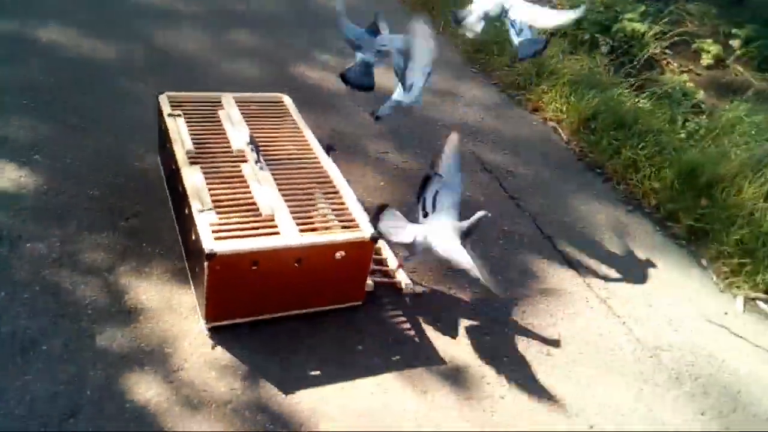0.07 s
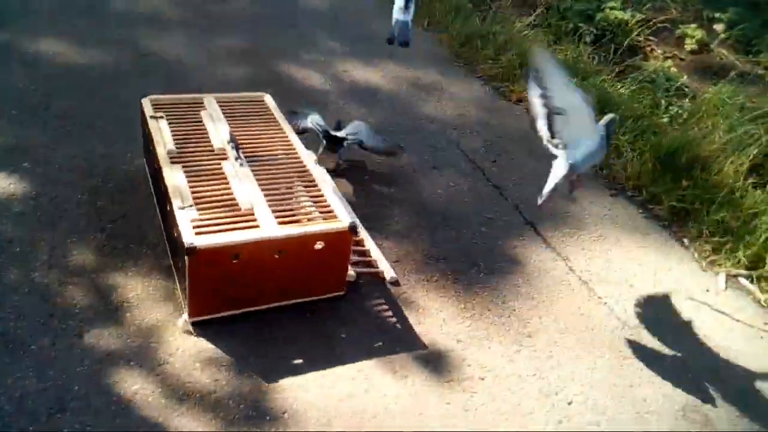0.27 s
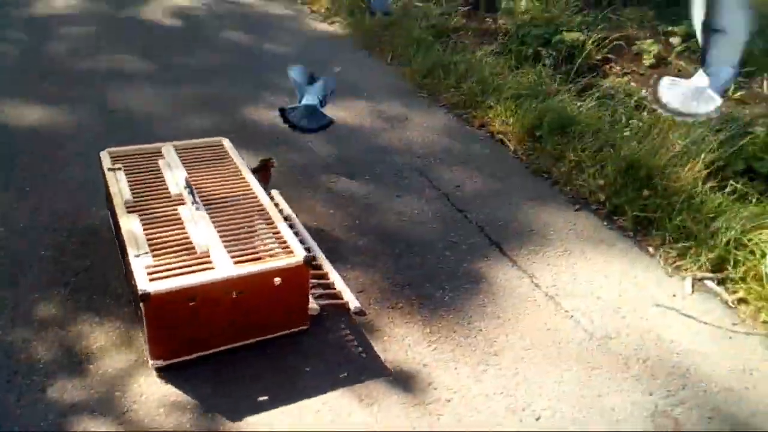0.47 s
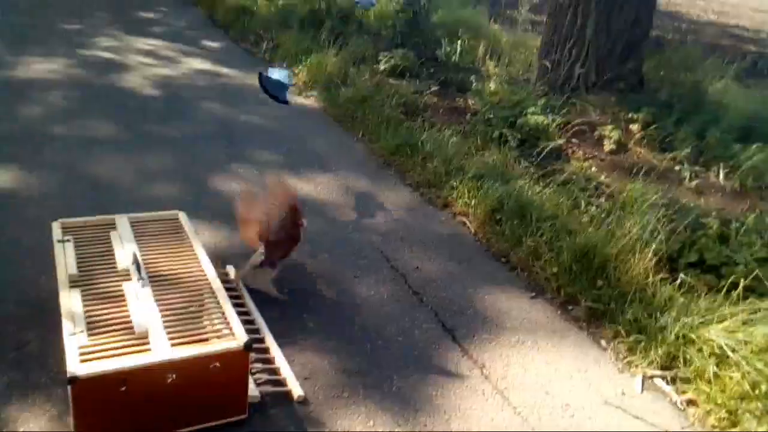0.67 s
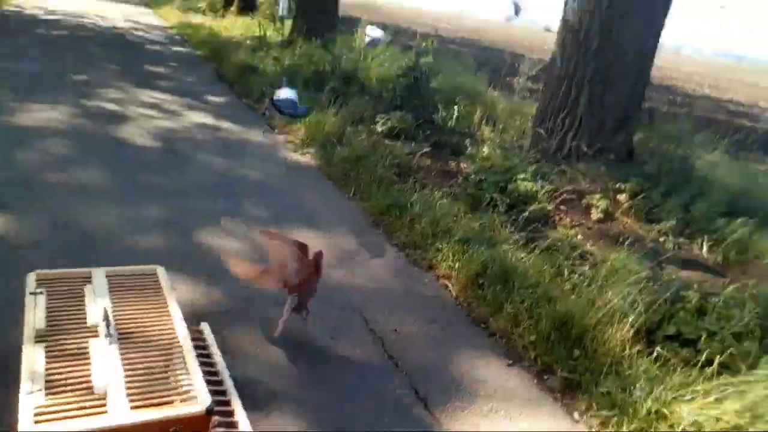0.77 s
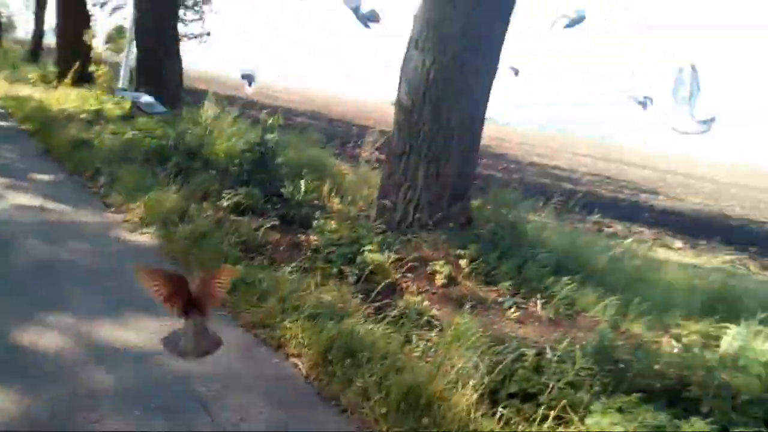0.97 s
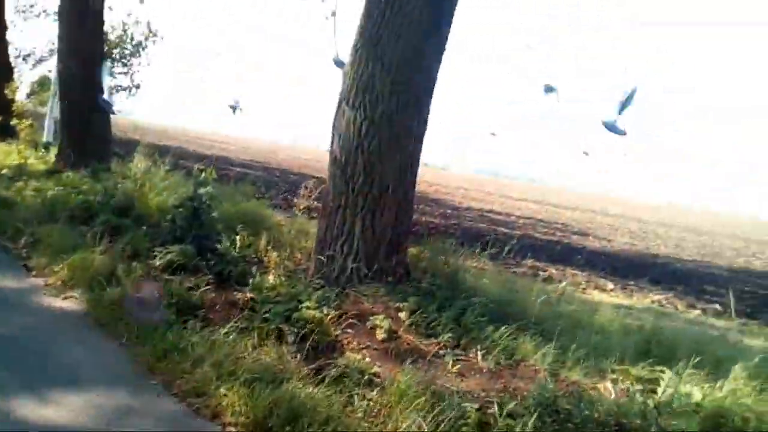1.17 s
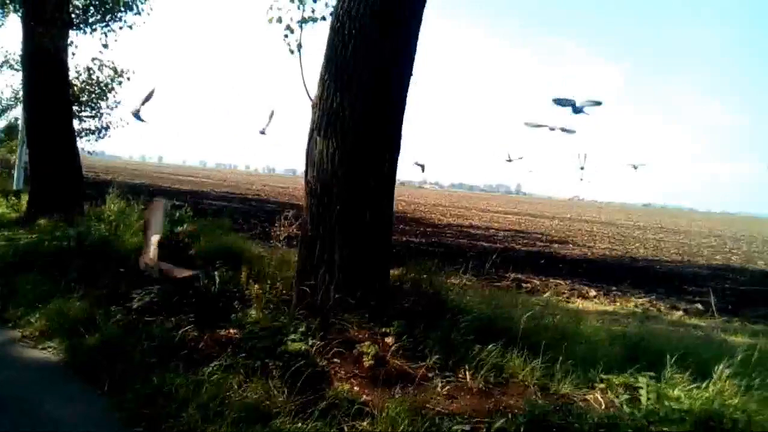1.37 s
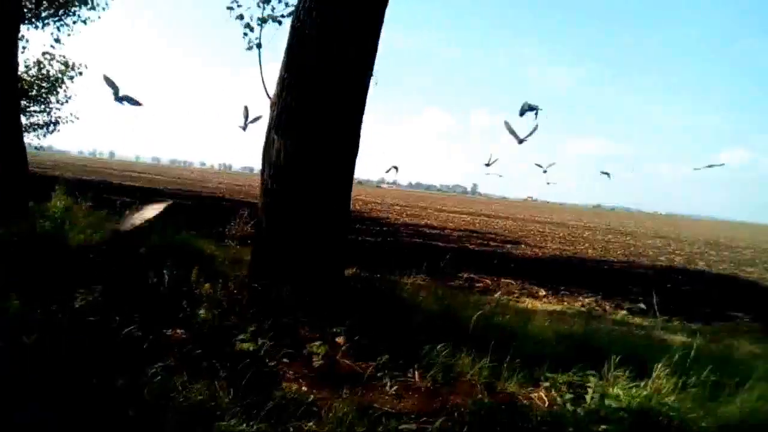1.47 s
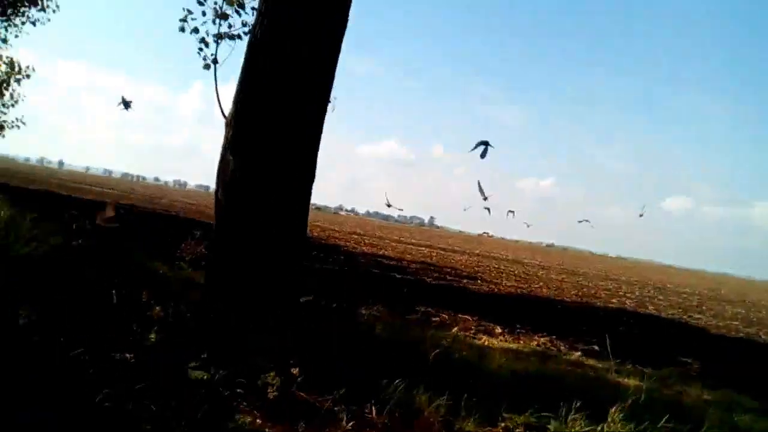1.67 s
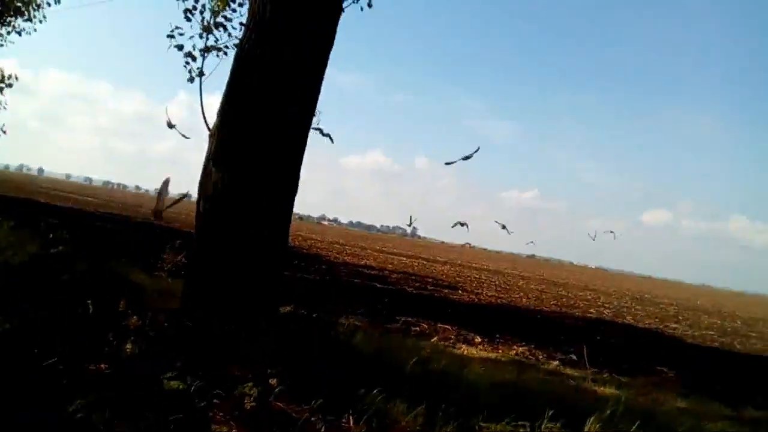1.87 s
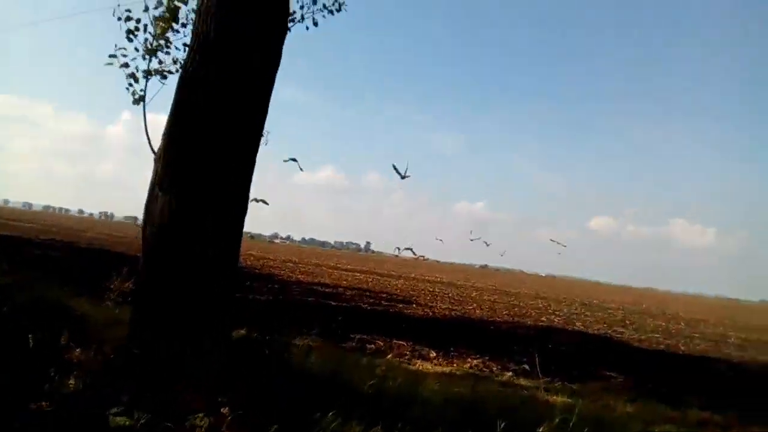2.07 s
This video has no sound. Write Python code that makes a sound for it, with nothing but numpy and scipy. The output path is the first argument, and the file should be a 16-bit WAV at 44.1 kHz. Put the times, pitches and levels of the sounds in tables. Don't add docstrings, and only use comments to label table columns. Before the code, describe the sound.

Pigeon wings flap from the start, with dense dry claps, feather rustle and overlapping airy strokes a few metres away. The sharpest, loudest cracks come around 0.5-0.7 s, with more scattered strong claps until 1.1 s. The flock then recedes into sparse, fainter flaps over steady leaf hiss and soft breeze puffs. From about 1.75 s to the end at 2.1 s, low wind buffets the phone microphone, with a last few claps.

```python
import sys
import numpy as np
from scipy import signal
from scipy.fft import rfft, irfft
from scipy.io import wavfile
from scipy.ndimage import uniform_filter1d

SR = 44100
rng = np.random.default_rng(int(sys.argv[2]) if len(sys.argv) > 2 else 0)


def master_out(mix):
    frames = np.transpose(np.atleast_2d(mix))
    ceiling = np.clip(frames, -1, 1)
    pcm = np.round(ceiling * 32767).astype(np.int16)
    wavfile.write(sys.argv[1], SR, pcm)


def magnitude_from_level(level_db):
    exponent = np.asarray(level_db, float) / 20
    return 10 ** exponent


N = 93888


def level(x, db):
    return x * magnitude_from_level(db) / np.sqrt(np.mean(x ** 2))


def curve(points):
    return np.interp(np.arange(N) / SR, *np.array(points).T)


def colour(x, points, size=2048):
    hz, db = np.array(points).T
    f = np.maximum(np.arange(size // 2 + 1) * SR / size, 1)
    log_gain = np.interp(np.log(f), np.log(hz), db) * np.log(10) / 20
    cepstrum = irfft(log_gain)
    cepstrum[1:size // 2] *= 2
    cepstrum[size // 2 + 1:] = 0
    impulse = irfft(np.exp(rfft(cepstrum)))
    return signal.fftconvolve(x, impulse)[:len(x)]


def band(x, hz, q):
    return signal.lfilter(*signal.iirpeak(hz, q, fs=SR), x, axis=-1)


def lowpass(x, hz):
    return signal.sosfilt(signal.butter(2, hz, fs=SR, output="sos"), x)


def walk(rate):
    hold = int(SR / rate)
    steps = np.repeat(rng.standard_normal(N)[:N // hold + 1], hold)[:N]
    return 1.3 * uniform_filter1d(uniform_filter1d(steps, hold), hold)


def grains(per_s, scatter_db):
    hit = rng.random(N) < per_s / SR
    boost_db = scatter_db * np.minimum(rng.exponential(size=N), 3)
    return hit * rng.standard_normal(N) * magnitude_from_level(boost_db)


def unit_peak(x, hz):
    return x / np.abs(band(x, hz, 1.5)).max()


CRACK_MS, CRACK_TOP_HZ = .08, 8800
TAIL_DB, SLAP_SCATTER_DB, ECHO_MS, ECHO_DB = -17, 4, 9, -15
THUMP_HZ, THUMP_RISE_MS = 1370, 0.99
SNAP_HZ, SNAP_SHARE = 9800, 0.93


def clap(ms, tail_ms, thump_db, snap_db, crack_db):
    slap_noise, slap_level, air, feathers = rng.standard_normal((4, len(ms)))

    def fade(share):
        return np.exp(-(ms / max(share * tail_ms, .3)) ** 2)

    slaps = slap_noise * magnitude_from_level(SLAP_SCATTER_DB * 5 * uniform_filter1d(slap_level, size=25))
    tail = slaps * (fade(0.63) + magnitude_from_level(ECHO_DB) * np.exp(-ms / ECHO_MS))
    crack = magnitude_from_level(crack_db) * np.exp(-ms / CRACK_MS) + magnitude_from_level(TAIL_DB) * tail
    crack = band(lowpass(crack, CRACK_TOP_HZ), 4900, .85)

    squeezed = air * (1 - np.exp(-ms / THUMP_RISE_MS)) * fade(1)
    thump = band(band(squeezed, THUMP_HZ, .9), THUMP_HZ, .9)
    snap = band(band(feathers * fade(SNAP_SHARE), SNAP_HZ, .9), SNAP_HZ * 1.2, .8)

    burst = unit_peak(crack, 3800)
    burst += magnitude_from_level(thump_db + 3) * unit_peak(thump, THUMP_HZ)
    burst += magnitude_from_level(snap_db - 6) * unit_peak(snap, SNAP_HZ)
    return burst


CLAP_DB = 2
NEAR_CRACK_DB, LAST_CRACK_DB, FAR_CRACK_DB = -7, 0, -4
# start in seconds, peak in dB, tail in ms, air thump in dB, feather snap in dB.
NEAR_CLAPS = [(0.0054, -22.5, 18, -2, 11), (0.0304, -47, 3.9, -9, -1.5), (0.0772, -14.5, 5.4, -29, -2),
              (0.0844, -34, 5.4, -13, -5), (0.1218, -15.5, 7.4, -8, 9), (0.1361, -10.5, 5.8, -15, -15),
              (0.178, -25, 7.7, 4.5, -5), (0.189, -25, 3.4, -2, -8), (0.2, -12.5, 2.9, -2, 10),
              (0.205, -16, 10, -6, -10), (0.2252, -8.5, 3.3, -22, -6), (0.228, -13, 3.7, -26, -4),
              (0.2335, -12, 5.5, -11.5, -3), (0.2388, -18, 3, -26, -8), (0.286, -26, 9.5, -4, 0),
              (0.3035, -19, 2.5, -10, -3), (0.3058, -13, 7.1, -4.5, 1), (0.3164, -20, 6.5, -2.5, -9),
              (0.339, -17, 4, -4, 0), (0.3618, -28.5, 3.5, 9.5, -7), (0.3917, -12.5, 11, -10, 5),
              (0.4223, -15, 4.4, -10, -3), (0.4314, -21, 4.2, -21, 14.5), (0.4504, -21, 5.7, -5.5, -5),
              (0.4631, -10.5, 5.6, -13.5, 4)]
LAST_CLAPS = [(.4935, -7, 2.3, -10.5, -12), (.519, -7, 6.2, -8, -20), (.5405, -7.5, 2.5, -16, -14),
              (.5619, -4, 4.6, -16.5, -14), (.598, -20, 4.6, -1, -15), (.608, -18, 4.6, -4, -15),
              (.616, -17, 6, -9, -15), (.654, -15, 23, -5.5, -15), (.676, -2.5, 0.55, -18, -19),
              (.6781, -16, 1.1, -19, -20), (.6798, -3, 1.1, -14, -22), (.6812, -3, 1.6, -26, -19),
              (.76, -11, 3.2, -18, -3), (.767, -19, 3.4, -1.5, -9), (.7995, -13, 3.4, -32, 9),
              (.9003, -26, 12, -7, -2), (.9726, -5.5, 5.8, -11, -17), (1.0067, -23, 5.9, -4, -6),
              (1.025, -11.5, 1.2, -11.5, 18.5), (1.0828, -8.5, 5.5, -19, -2), (1.0858, -16, 3.2, -17, -3)]
FAR_CLAPS = [(1.1196, -17.5, 8.7, -27, -3), (1.1951, -17.5, 4.4, -11, 7), (1.2662, -26, 6.8, -8, 12),
             (1.3195, -16, 2.9, -7.5, 0), (1.3493, -21, 7.1, 0.5, 8.5), (1.411, -33, 2.6, 7, -6),
             (1.419, -29.5, 3.2, 9, -6), (1.43, -24.5, 2.7, -1, 13), (1.476, -31, 3, 2, -6),
             (1.4911, -26.5, 6.7, 3, 4), (1.495, -23.5, 6.5, 3.5, 5), (1.5339, -35, 9.2, 9.5, 1),
             (1.5505, -15.5, 5.5, -5.5, -1), (1.7805, -17, 2.5, -20, -4), (1.8985, -11.5, 1.26, -11.5, 10),
             (1.958, -22.5, 1.8, -15, -5), (2.0968, -28, 9.5, -22, -8)]


def claps(size=2048):
    out, ms = np.zeros(N + size), np.arange(size) / SR * 1000
    groups = [(NEAR_CLAPS, NEAR_CRACK_DB), (LAST_CLAPS, LAST_CRACK_DB), (FAR_CLAPS, FAR_CRACK_DB)]
    for table, crack_db in groups:
        for s, db, tail_ms, thump_db, snap_db in table:
            i = int(s * SR)
            out[i:i + size] -= clap(ms, tail_ms, thump_db, snap_db, crack_db) * magnitude_from_level(db + CLAP_DB) / 3
    return out[:N]


STROKES_PER_S, STROKE_MS, STROKE_SCATTER_DB = 120, 8, 1
RUSTLES_PER_S, RUSTLE_SCATTER_DB = 3000, 1.5
WHOOSH_DB, RUSTLE_DB = -36.5, -41
# time in seconds, level in dB.
FLOCK = [
    (0, 4),
    (.3, 3),
    (.5, 0.5),
    (.7, 1),
    (.9, -1),
    (1.1, -4),
    (1.4, -10),
    (1.6, -14),
    (2.13, -16.5),
]
# frequency in Hz, level in dB.
WHOOSH = [(40, -42), (130, -9.5), (300, 0), (600, 3.5), (1400, 2), (2500, -3.5), (5000, -21.5),
          (12000, -15)]


def strokes():
    puff = signal.windows.hann(int(2 * STROKE_MS * SR / 1000))
    beats = np.abs(grains(STROKES_PER_S, STROKE_SCATTER_DB))
    return level(signal.fftconvolve(beats, puff, "same").clip(0) ** .5, 0)


def wingbeats():
    shared = strokes()
    air = colour(rng.standard_normal(N), WHOOSH)
    low, below_2k = lowpass(air, 700), lowpass(air, 2000)
    parts = (low, below_2k - low, air - below_2k)
    whoosh = sum(part * (0.67 + .5 * shared + strokes()) for part in parts)
    rustle = band(grains(RUSTLES_PER_S, RUSTLE_SCATTER_DB), 4200, 1) * (shared + strokes())
    return (level(whoosh, WHOOSH_DB) + level(rustle, RUSTLE_DB)) * magnitude_from_level(curve(FLOCK))


# start in seconds, peak in dB, pitch in Hz, ring in ms down to -60 dB.
POPS = [(0.2011, -23, 3950, 13), (.2275, -21, 4350, 16), (.2405, -23, 3800, 14), (0.4652, -23, 4060, 14),
        (0.4936, -17.5, 3830, 11), (.5192, -19.5, 3180, 18), (.5235, -25, 2820, 16),
        (0.5404, -33, 3900, 10), (0.562, -32, 3900, 9), (0.974, -33, 3400, 9), (1.0832, -29, 3620, 9),
        (1.0857, -17.5, 1920, 13.5), (1.7803, -26.5, 4130, 9)]


def pops():
    out, t = np.zeros(N), np.arange(1024) / SR
    for s, db, hz, ring_ms in POPS:
        phase = 2 * np.pi * hz * t + .05 * np.cumsum(rng.standard_normal(len(t)))
        ring = magnitude_from_level(db - 60 * t * 1000 / ring_ms) * (1 - np.exp(-t / .0002))
        i = int(s * SR)
        out[i:i + len(t)] -= ring * np.sin(phase)
    return out


def swells(table, rough):
    out, t = np.zeros(N), np.arange(N) / SR
    for s, db, hz, length_ms in table:
        u = t - s
        swell = magnitude_from_level(db) * np.exp(-(u * 2000 / length_ms) ** 2)
        out += swell * np.sin(2 * np.pi * hz * u + rough * walk(hz / 2))
    return out


# centre in
# seconds, peak in dB, pitch in Hz, length in ms.
DOWNSTROKES = [(.005, -35.5, 480, 18), (0.106, -23.5, 387, 3.7), (0.192, -31, 1198, 31),
               (0.201, -30, 554, 29), (0.313, -30, 297.5, 8.6), (0.421, -29, 382.5, 13),
               (.662, -28, 351.6, 3.1), (0.841, -35, 313, 11.5), (.93, -40, 669, 25),
               (1.181, -34, 244, 4.4), (1.223, -32, 435, 4.4), (.233, -28, 746, 8), (1.025, -33, 502, 5.9),
               (1.086, -34, 675, 8.7), (1.222, -36, 10000, 35), (1.421, -41, 1333, 11),
               (1.535, -41, 1220, 9.9)]


def downstrokes():
    return swells(DOWNSTROKES, rough=1.2)


# centre in seconds, peak in dB, pitch in Hz, length in ms.
PUFFS = [(.094, -45.5, 93, 63), (.15, -51, 124, 46), (.24, -52, 90, 21), (.325, -55, 106, 33),
         (.44, -50, 111.2, 63), (.506, -48, 131.8, 30), (.62, -58, 88, 30), (.688, -44.5, 142.3, 48),
         (.78, -43, 110, 55), (.962, -52, 91.4, 27), (1.06, -49, 100.8, 91), (1.185, -41, 128.1, 34),
         (1.25, -48.5, 117.5, 94), (1.33, -46.5, 102, 94), (1.41, -46, 98, 43), (1.565, -59, 80.8, 31),
         (1.642, -55, 79.5, 23), (1.74, -43, 90.5, 40), (1.77, -39, 89.7, 46)]


def puffs():
    return swells(PUFFS, rough=1.9)


EDDIES_PER_S, EDDY_SCATTER_DB = 700, 2
GUST_FULL_DB, BREEZE_HZ = -40, 139
# time in seconds, level in dB.
GUST = [(0, -48.5), (.4, -54.5), (.8, -50), (.9, -70), (1.04, -62), (1.13, -73), (1.2, -57.5), (1.42, -50),
        (1.47, -78), (1.7, -80), (1.73, -48.5), (1.80, -28.5), (1.855, -41.5), (1.88, -27), (1.94, -28),
        (1.99, -27.5), (2.03, -34), (2.13, -30)]
# frequency in Hz, level in dB.
BUFFET = [(30, -48), (70, -8.5), (190, 1.5), (300, -0.5), (470, -9.5), (760, -14.5), (1200, -30.5),
          (3000, -69)]
# centre in seconds, peak in dB, cycle in ms.
EDDIES = [(1.751, -27, 2.1), (1.782, -17.5, 2.2), (1.777, -25, 2.8), (1.795, -28.5, 2.8),
          (1.8015, -16.5, 1.96), (1.806, -18.5, 3.9), (1.828, -25, 2), (1.842, -21, 3.8), (1.834, -14, 2.5),
          (1.8917, -16, 3.1), (1.9125, -16, 2.1), (1.921, -23, 3), (1.934, -30, 2.7), (1.939, -29.5, 11.5),
          (1.958, -22, 4.4), (1.968, -25, 4.2), (1.9735, -22, 2.6), (1.98, -26, 3), (1.9942, -30, 1.7),
          (2.015, -13.5, 3.4), (2.043, -16.5, 3.5), (2.073, -18.5, 2.6), (2.092, -19.5, 2.7),
          (2.114, -17, 2.6)]


def wind():
    gust_db = curve(GUST)
    buffet = level(colour(grains(EDDIES_PER_S, EDDY_SCATTER_DB), BUFFET, size=4096), 0)
    buffet = level(buffet / uniform_filter1d(buffet ** 2, size=1100) ** .38, 0)
    breeze = level(lowpass(buffet, BREEZE_HZ), 0)
    full = np.clip(1 + (gust_db - GUST_FULL_DB) / 6, 0, 1)
    out = (full * buffet + (1 - full) * breeze) * magnitude_from_level(gust_db)
    ms = np.arange(N) / SR * 1000
    for s, db, cycle_ms in EDDIES:
        u = (ms - s * 1000) / cycle_ms * 4
        out -= magnitude_from_level(db) * 1.65 * (u - .2 * u ** 3) * np.exp(-u ** 2 / 2)
    return out


LEAVES_DB, LEAF_FLICKER_DB = -42.5, 1.1
# frequency in Hz, level in dB.
LEAVES = [(40, -14), (100, -4.5), (250, -13), (600, -6), (1200, -2), (3000, -2), (6500, -4), (12000, -40)]


def leaves():
    hiss = level(colour(rng.standard_normal(N), LEAVES), LEAVES_DB)
    return hiss * magnitude_from_level(LEAF_FLICKER_DB * walk(13.9))


def scene():
    birds = claps() + wingbeats() + pops() + downstrokes()
    return (birds + puffs() + wind() + leaves())[None]


def band_limit(x):
    return signal.sosfilt(signal.butter(12, 15770, fs=SR, output="sos"), x)


HISS_DB, TOP_HZ = -57, 15750
# frequency in Hz, gain in dB.
MIC = [(40, 0), (200, -1.5), (2500, -7), (3750, 5), (4900, -5), (6900, -17.5), (7900, -29), (13000, -32.5)]
# frequency in Hz, level in dB.
HISS = [(2000, 16), (8000, -1.5), (11000, -4), (13800, -11.5), (14700, 8.5), (15500, 2), (17000, 3)]


def record(dry):
    x = colour(dry[0], MIC) + level(colour(rng.standard_normal(N), HISS), HISS_DB)
    x = .6 * np.tanh(x / .6)
    x = signal.sosfilt(signal.ellip(10, .2, 70, TOP_HZ, fs=SR, output="sos"), x)
    return band_limit(x[None])


dry = scene()
out = record(dry)
master_out(out)
```